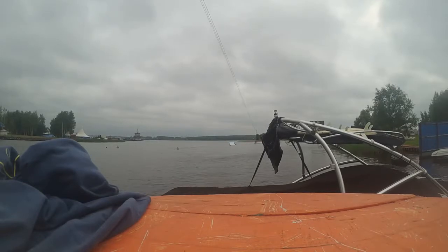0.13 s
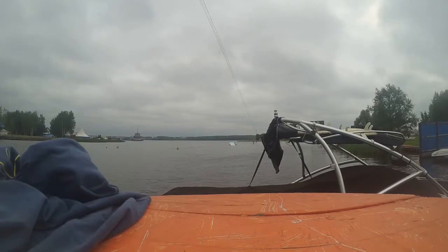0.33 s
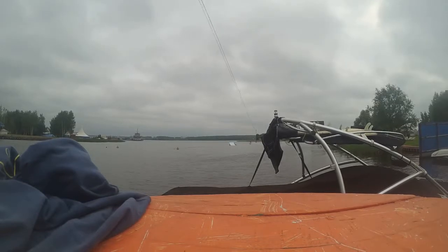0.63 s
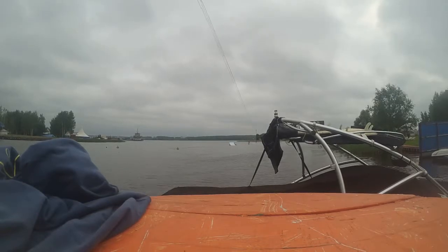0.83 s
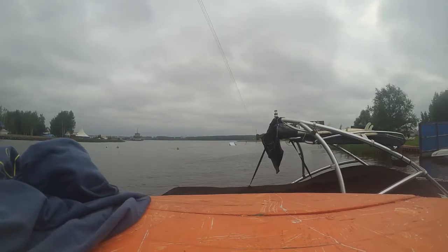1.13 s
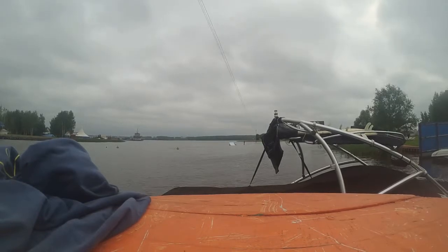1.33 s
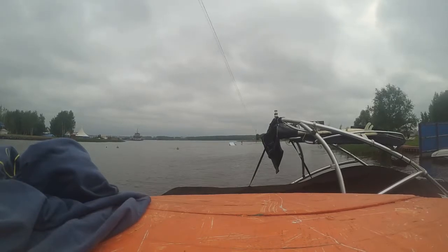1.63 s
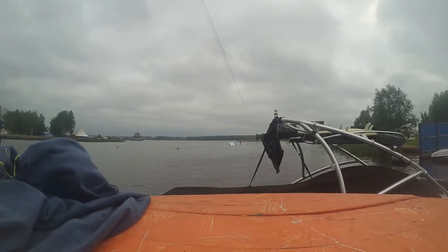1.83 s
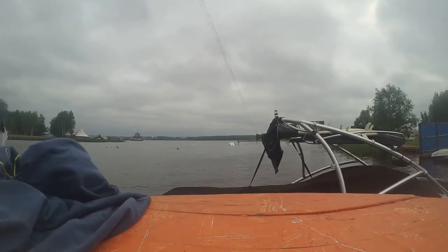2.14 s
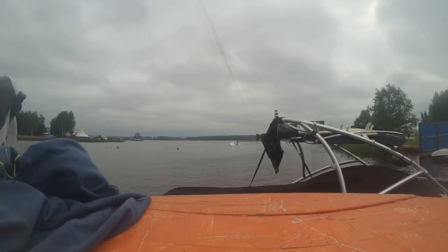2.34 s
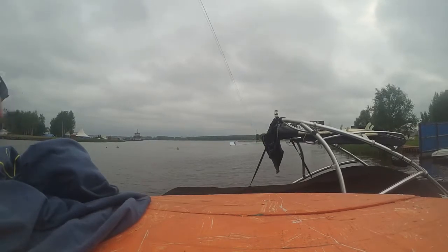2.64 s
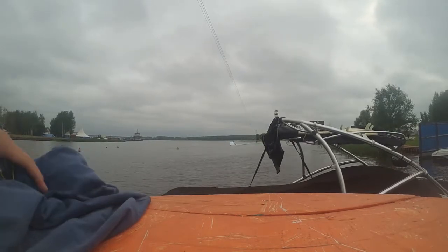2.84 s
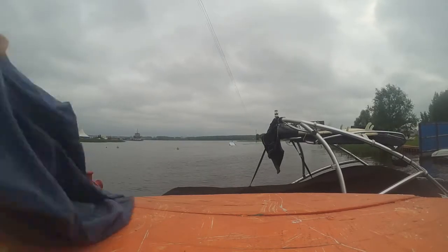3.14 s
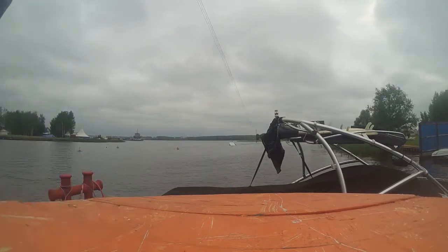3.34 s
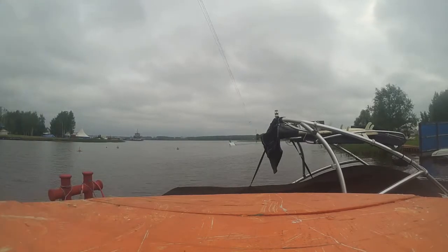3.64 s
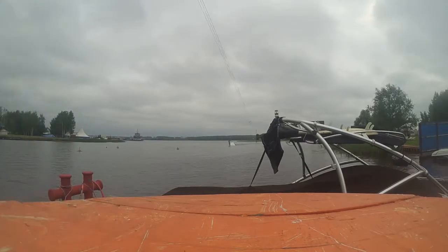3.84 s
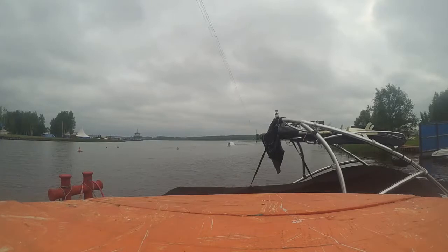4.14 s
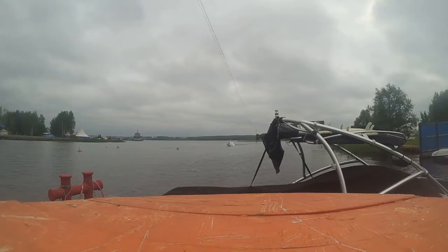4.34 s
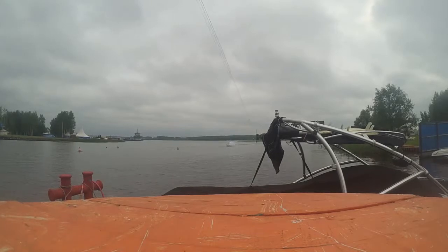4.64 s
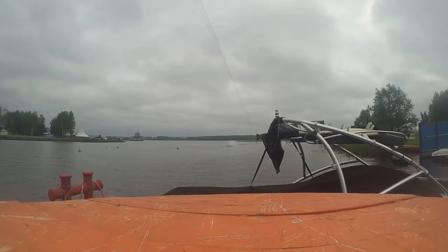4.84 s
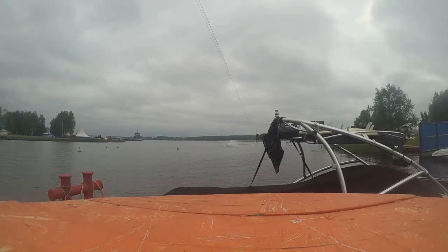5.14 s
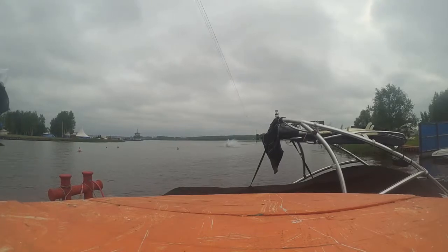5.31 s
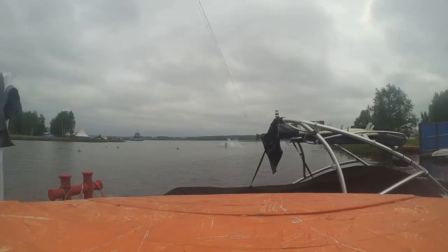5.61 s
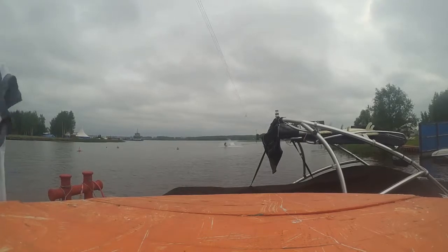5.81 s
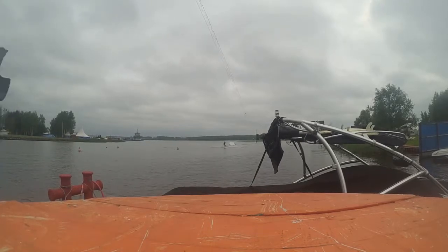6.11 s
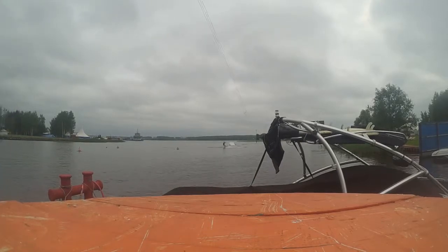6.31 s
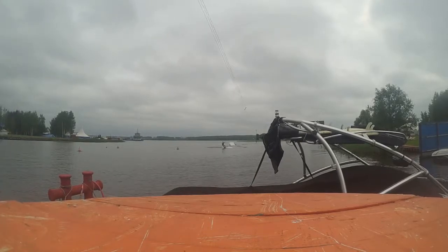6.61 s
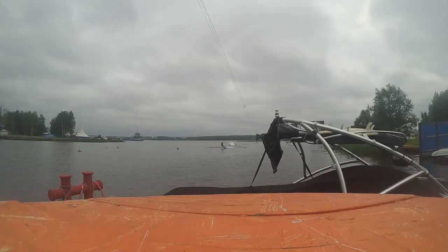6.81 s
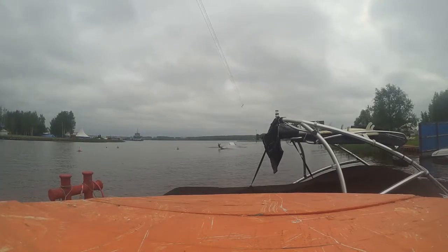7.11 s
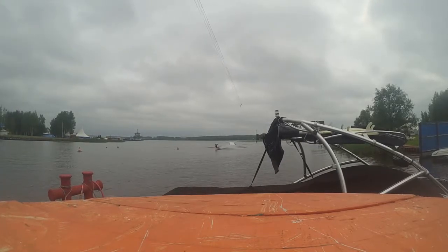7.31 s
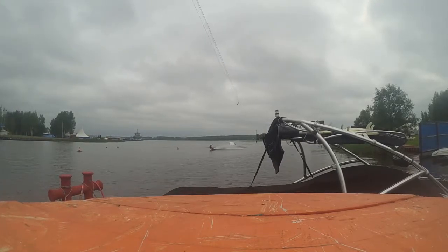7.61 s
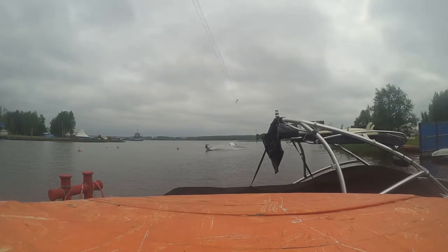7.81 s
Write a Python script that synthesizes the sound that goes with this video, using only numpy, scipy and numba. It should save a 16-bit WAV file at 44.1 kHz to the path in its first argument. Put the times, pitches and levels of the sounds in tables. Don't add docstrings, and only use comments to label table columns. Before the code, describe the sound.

Low watery booms under a hollow float outdoors, a short fabric rustle, a sharp clattering flurry of bumps, then soft swells with distant spray hiss.

```python
import sys
import numpy as np
from scipy import signal
from scipy.fft import rfft, irfft
from scipy.io import wavfile
from scipy.ndimage import uniform_filter1d
from numba import njit

SR = 44100
rng = np.random.default_rng(int(sys.argv[2]) if len(sys.argv) > 2 else 0)


def output_pcm(signal):
    pcm = np.clip(np.atleast_2d(signal).T, -1, 1) * 32767
    wavfile.write(sys.argv[1], SR, np.round(pcm).astype(np.int16))


def nominal_scale(level):
    x = np.asarray(level, float) / 20
    return 10 ** x


N = 350902

# pitch_hz, t60_s, level_db
WALL_MODES = [(72.07, 0.53, 0)]
DECK_MODES = [(95.27, 0.29, 0)]
CAVITY_MODES = [(131.74, 0.32, 0)]
PANEL_MODES = [(184, 0.38, -6), (189.1, 0.17, 10.5), (209.2, 0.13, 3), (290, 0.17, -17)]
# pitch_hz, t60_s, level_db
RIM_MODES = [(267.5, 0.21, 4), (286.2, 0.36, 4), (304, 0.42, -23.5)]
# crest_s, cavity_db, walls_share_db, deck_share_db
WAVES = [(0.07, -65, -12, -4), (0.31, -47, -7, -18), (0.44, -58.5, 7.5, 0.5), (0.72, -57.5, -16, -14),
         (0.95, -57, -3, -2.5), (1.18, -41, -2, -2.5), (1.27, -35.5, -13, -22), (1.658, -47, -5, -4.5),
         (1.99, -64, 6, 7.5), (2.37, -54, -17, -6), (2.62, -55.5, 0, -4), (2.85, -52, -14, -10),
         (3.17, -54.5, -2, -1), (3.36, -69, 17, 3), (3.68, -54, -7, -18), (4.148, -47.5, 1.5, -8),
         (4.32, -52.5, 5, -19), (4.43, -52, 9, 5.5), (4.62, -36.5, 8, 0.5), (4.738, -38.5, 5, -30),
         (5.03, -53, -22, -26), (5.249, -47, -22, -35), (5.48, -49.5, -18, -11.5), (5.95, -64.5, -8, 4.5),
         (6.2, -57, -12, -18), (6.32, -54.5, -5, 10), (6.479, -41.5, 2, -30), (7.01, -34.5, -13, -11),
         (7.12, -42, -11, -8.5), (7.21, -60, 19.5, -3), (7.82, -34.5, -24, -30)]
# start_s, cavity_peak_db, panels_db, rim_db
SLAPS = [(0.279, -34, -51.5, -74), (0.418, -45.5, -55.5, -61), (1.161, -31.5, -43.5, -78),
         (1.185, -39, -40.5, -68), (1.659, -54, -54, -57), (1.767, -53, -59.5, -64), (3.298, -43, -53, -66),
         (3.345, -49, -74, -74), (3.996, -39.5, -59, -65), (4.146, -49, -50, -66), (4.409, -46, -50, -65),
         (4.518, -45, -37, -45), (4.531, -39, -31.5, -32.5), (4.594, -39, -31.5, -38),
         (4.724, -30, -44, -56), (5.224, -41.5, -58, -83), (6.3, -60, -70, -86), (6.889, -50, -67, -80),
         (7.782, -34, -64, -83)]
# time_s, level_db
SWAY_LEVEL = [(0.0, -63), (0.44, -33), (0.73, -45.5), (0.95, -40.5), (1.2, -51), (1.24, -37.5), (1.37, -31),
              (1.42, -60), (1.48, -45.5), (1.79, -29.5), (1.93, -44.5), (4.76, -56), (5.49, -41.5),
              (6.62, -61.5), (7.62, -47), (7.95, -57)]
# pitch_hz, t60_s, level_db
SWAY_MODES = [(7, 0.6, 1.5), (12, 0.63, -10), (18, 0.48, -2)]
# crest_s, level_db, fall_db_per_s
HEAVES = [(0.32, -33.5, 56), (1.2, -44, 46), (1.44, -41, 23), (1.64, -36.5, 76), (2.1, -50, 12),
          (3.39, -45, 52), (4.17, -39.5, 19), (4.68, -46, 71), (5.88, -49, 36), (6.55, -51, 71),
          (7.15, -51, 43), (7.86, -48.5, 56)]
# pitch_hz, t60_s, level_db
HEAVE_MODES = [(35.24, 0.67, 0)]
# start_s, peak_db
JOLTS = [
    (0.293, -30),
    (1.619, -24.5),
    (4.129, -29.5),
]
# start_s, peak_db,
# pitch_hz, swell_s
THUMPS = [(1.158, -27.5, 188, 0.021), (1.175, -24, 162.6, 0.013), (1.195, -22.5, 131, 0.017),
          (1.242, -21.5, 134.7, 0.021), (3.164, -53.5, 1610, 0.0067), (3.188, -61, 2150, 0.0071),
          (3.222, -61, 2230, 0.0051), (3.063, -61, 1660, .006), (3.299, -43, 204, 0.0064),
          (3.325, -44.5, 204, 0.023), (4.027, -43, 135, 0.02), (4.135, -34.5, 141, 0.014),
          (4.2, -39, 35, 0.2), (4.408, -39, 152, 0.0091), (4.506, -27, 222.6, 0.039),
          (4.53, -20.5, 193.7, 0.013), (4.548, -24.5, 195, 0.0077), (4.54, -41, 280, 0.023),
          (4.55, -37, 1390, 0.0028), (4.553, -35, 772, 0.0045), (4.726, -50, 1440, 0.006),
          (4.016, -58, 1070, .002), (4.023, -56, 1090, .003), (4.079, -56, 1000, 0.0026),
          (4.0965, -37, 1160, 0.00095), (4.105, -45, 1000, 0.0023), (3.22, -58, 960, 0.0037),
          (3.254, -56, 1020, .005), (3.34, -59, 980, .008), (3.376, -62, 930, .005),
          (4.14, -48, 1900, 0.0028), (1.179, -28.5, 172, 0.01), (4.582, -19.5, 210.5, 0.014),
          (4.58, -44.5, 291, 0.021), (4.6, -35, 100.8, 0.031), (4.61, -32, 69.1, 0.083),
          (4.655, -36.5, 96.7, 0.02), (4.665, -29, 176.6, 0.013), (4.722, -28.5, 196, 0.018),
          (4.722, -42.5, 311, 0.011), (4.735, -34, 127.8, 0.023), (4.731, -30.5, 71.9, 0.056),
          (6.3, -54, 196, 0.054), (6.369, -37.5, 137.5, 0.032), (6.889, -40, 137.3, 0.034),
          (7.22, -38, 135.5, 0.016)]
# start_s, peak_db, lower_modes_db, upper_modes_db
KNOCKS = [(0.352, -46, -16, -30), (0.486, -51, -5, -10), (1.161, -47, -6, -16), (1.184, -55, -19, -24),
          (1.251, -56, -19, 3), (1.633, -51.5, -21, -17), (1.657, -50.5, 2.5, -30), (1.761, -45, -5, -33),
          (1.921, -49, -18, -20), (1.973, -48, -31, -15), (3.165, -52, -24, -9), (3.277, -50, -19, -8),
          (3.295, -43.5, -6, -3.5), (4.017, -55, 8.5, -10), (4.047, -42, -2, -16), (4.097, -33, -18, -8),
          (4.114, -30.5, -9, -9.5), (4.146, -34.5, -7, -8), (4.167, -37, -14.5, -26), (4.284, -52, -23, -3),
          (4.412, -49, -8, -4), (4.513, -34, -2.5, -17), (4.549, -29, -1, -19.5), (4.576, -40, -0.5, -34),
          (4.597, -35.5, -7, -30.5), (4.62, -38.5, -9, -16), (4.66, -36.5, -9.5, -22.5),
          (4.728, -33, 5, -42)]
# pitch_hz, t60_s, level_db
CASE_LOW = [(350, 0.19, -27), (535, 0.071, -3.5), (615, 0.05, -32.5)]
CASE_MID = [(885, 0.15, -13), (1024, 0.032, 2.5), (1240, 0.062, -9.5), (1403, 0.024, 1)]
CASE_HIGH = [(1760, 0.063, -13), (2193, 0.018, 0), (2890, 0.083, -13), (4070, 0.0066, 22)]
# start_s, level_db, hold_s, upper_modes_share_db
RUBS = [(0.358, -56.5, .01, -24), (1.18, -59, .01, -15), (2.991, -66, .08, -18), (3.087, -57, 0.069, -30),
        (3.17, -64, 0.025, -8), (3.22, -65, 0.082, -7), (3.29, -56.5, 0.03, -24), (3.328, -62, 0.043, -12),
        (4.022, -56.5, 0.016, -14), (4.1, -60, 0.023, -4), (4.21, -60.5, 0.094, -10),
        (4.404, -54, 0.016, -15.5), (4.442, -62, 0.071, -14), (4.533, -52, .02, -22),
        (4.537, -42, 0.013, -30), (4.594, -47, 0.017, -16.5), (4.724, -69, .01, -21)]
# start_s, peak_db, pitch_hz
LID_SLIPS = [(0.3548, -43, 1025), (1.6564, -44, 990), (1.7612, -45.5, 963), (1.9747, -55, 1040),
             (3.095, -53, 1090), (3.1007, -48, 1050), (3.1073, -56, 1020.0), (3.1143, -52, 920),
             (3.1624, -47, 1150), (3.1681, -49, 1130), (3.1736, -48, 1050.0), (3.1823, -46, 1050),
             (3.2441, -51, 1090), (3.2755, -49, 1190.0), (3.2934, -42, 1210.0), (3.2992, -50, 980.0),
             (3.3086, -56, 1100.0), (3.3216, -49, 990.0), (3.3286, -44.5, 1030.0), (4.0478, -37.5, 910.0),
             (4.1009, -40, 1140), (4.1131, -46, 1110.0), (4.1188, -42, 1160), (4.124, -50, 1020.0),
             (4.1395, -39, 1170), (4.1458, -42, 1150), (4.154, -38, 960), (4.1649, -37, 950.0),
             (4.1738, -41, 960), (4.4024, -46, 940), (4.409, -48, 1020), (4.4175, -56, 1060),
             (4.513, -30, 986), (4.5247, -45, 1020.0), (4.5324, -42, 1015), (4.5395, -38, 970.0),
             (4.5479, -19, 977), (4.5548, -34, 900.0), (4.5692, -47, 980.0), (4.5759, -33, 970),
             (4.5827, -37.5, 960.0), (4.5917, -37, 1000.0), (4.5989, -33, 1010), (4.6047, -41, 1070.0),
             (4.6109, -47, 1000), (4.6186, -38, 1010.0), (4.6302, -40, 1080), (4.6593, -38, 1140),
             (4.6671, -45, 1020.0), (4.6785, -53, 1070.0), (4.7286, -44, 1250)]
# start_s, peak_db
TAPS = [(3.101, -58), (3.15, -46), (3.185, -52), (3.222, -55), (3.244, -52), (3.329, -44), (4.022, -50),
        (4.08, -62), (4.123, -46), (4.384, -47), (4.525, -31), (4.538, -43), (4.557, -30), (4.635, -39),
        (4.788, -44)]
# start_s, peak_db, top_modes_db
DROPS = [(0.0623, -52, 0.5), (0.186, -48, -2), (0.542, -48.5, 0), (0.571, -55.5, 1.5), (1.046, -51, -1),
         (1.082, -54.5, 2), (1.5878, -53.5, 4), (2.1182, -55, -2), (2.164, -50.5, -23), (2.223, -51, -16),
         (2.6475, -47.5, -1.5), (3.211, -55, 3.5), (3.243, -52, 3), (3.7223, -57.5, 6), (4.1011, -50, -23),
         (4.143, -63, -19), (4.22, -49, -22), (4.2645, -49.5, 1), (4.554, -57, -6), (4.804, -45.5, -6),
         (5.092, -55, -5.5), (5.2235, -49, -2.5), (5.343, -53, 2.5), (5.6722, -56.5, 1), (5.8828, -44, -4),
         (6.2448, -51.5, 2), (7.024, -46.5, -3), (7.2638, -49, -10), (7.463, -53, 0), (7.5026, -55.5, -12)]
# start_s, peak_db
SMALL_TICKS = [(0.3451, -63), (0.5124, -58), (1.3043, -57), (1.4476, -57), (2.005, -68), (2.0482, -61),
               (2.2483, -63), (2.4019, -59), (2.4618, -54), (2.7876, -61), (2.9417, -58), (3.0021, -61),
               (3.0619, -60), (3.1472, -56), (3.5423, -56), (3.8482, -63), (4.0218, -54), (4.2068, -59),
               (4.3879, -61), (5.1018, -55), (5.462, -57), (5.8217, -52), (6.3909, -54.5), (6.4817, -53),
               (6.5475, -59), (6.782, -59), (7.202, -60), (0.4219, -57), (0.7881, -55), (0.9243, -63),
               (5.5887, -54), (6.3614, -59), (6.5111, -58), (6.6574, -49), (6.8573, -53), (7.2315, -58),
               (7.3876, -68.5)]
# pitch_hz, t60_s, level_db
DROP_MID = [(2904, 0.05, -0.5), (3042, 0.024, 3.5), (1910, 0.092, -14.5), (1380, 0.0077, -9)]
DROP_TOP = [(6460, 0.0076, -1.5), (7380, 0.0025, 8)]
# time_s, level_db
SPRAY_LEVEL = [(0.0, -70), (1.02, -77), (3.19, -72.5), (4.1, -75.5), (4.36, -70), (4.94, -70.5),
               (5.56, -70.5), (5.92, -65), (6.27, -65), (7.27, -71), (7.6, -64.5), (7.96, -62)]
# pitch_hz, density_db_per_hz
SPRAY_COLOUR = [(880, -10), (1500, -5.5), (2010, -5), (2860, -4.5), (3170, -3), (3740, -2), (4620, -5),
                (4940, 0), (5650, -6.5), (9000, -17), (11700, -25), (19800, -120)]
# pitch_hz, width_hz, level_db
SPRAY_PEAKS = [(3763, 91, -1.5), (4065, 246, -3.5), (4370, 90, -10.5), (4850, 120, 0.5)]
# pitch_hz, density_db_per_hz
AIR_COLOUR = [(94, -7.5), (160, 10.5), (243, -39), (357, -48), (632, -39.5), (751, -26.5), (1190, -1.5),
              (1610, -34), (2310, -34), (2910, -18.5), (4600, -8), (4960, -39), (5460, -23.5), (10200, -20),
              (15300, -22.5)]
# pitch_hz, width_hz, level_db
AIR_PEAKS = [(541.7, 6.8, -4), (997, 116, -10), (1435.4, 58, -5), (1962, 146, -14), (2913, 420, -15),
             (3930, 9, -9), (4410, 22, -12.5), (4942, 67, -8.5), (5130, 61, -11), (5970, 47, -16),
             (6530, 53, -21), (7230, 440, -19.5)]
# pitch_hz, width_hz, level_db
HUM_PEAKS = [(269, 8.7, -3.5), (311, 38, -12), (419, 7.1, -1), (463, 3.1, 1), (631.6, 8.1, 2),
             (642, 4.3, -13)]
# pitch_hz, rms_db
WHINE_TONES = [(2998, -83.5), (3978, -87), (4409, -73), (4584, -82), (4872, -74.5), (5044, -87.5),
               (5130, -66), (5335, -107), (5416, -87), (5593, -84), (6282, -88), (7434, -88), (8586, -87.5),
               (8764, -100), (9916, -81), (10088, -86.5), (10174, -82.5), (10460, -99), (10928, -88),
               (14960, -102)]
# pitch_hz, density_db_per_hz
SIDE_COLOUR = [(20, -70), (300, -61.5), (480, -37), (900, -44), (2660, -45), (4030, -43), (4900, -40.5),
               (5470, -43), (10100, -50.5), (15300, -50)]


def shell():
    crest_s, db, walls_db, deck_db = np.transpose(WAVES)
    slap_s, _, slap_db, _ = np.transpose(SLAPS)
    panel_s = np.r_[slap_s + 0.01, crest_s]
    panel_db = np.r_[slap_db - 8.5, db - 28]
    # group, times s, levels dB, calm level dB, rise dB/s, hold s, fall dB/s
    drives = [(WALL_MODES, crest_s, db + walls_db, -68, 185, 0, 118.5),
              (DECK_MODES, crest_s, db + deck_db, -85, 246, 0.12, 106),
              (CAVITY_MODES, crest_s, db, -63.5, 239.5, 0.1133, 107.5),
              (PANEL_MODES, panel_s, panel_db, -73, 612.5, 0.09, 193.5)]
    out = 0
    for group, times, level_db, calm_db, rise, hold, fall in drives:
        gain = surges(times, level_db, rise, fall, hold, calm_db)
        out = out + ringing(gain, group, steady=0.98, chop=0.58)
    return out


def slaps():
    s, cavity_db, panel_db, rim_db = np.transpose(SLAPS)
    cavity = modes(blows(s, cavity_db - 13.5, 0.00023), [(129.7, 0.32, 8.5), (127.7, 0.39, 3.0)])
    panels = modes(blows(s, panel_db - 9.5, 0.00061), PANEL_MODES)
    rim = beside(modes(blows(s, rim_db - 4.0, 0.02), RIM_MODES), RIM_MODES)
    return dull(dull(cavity, 182), 182) + dull(dull(panels, 288), 288) + dull(rim, 299)


def rocking():
    sway = ringing(curve(SWAY_LEVEL), SWAY_MODES, steady=0.51, chop=1.66)
    crest_s, heave_db, fall = np.transpose(HEAVES)
    heave_gain = surges(crest_s, heave_db, rise=170, fall=fall, calm_db=-66)
    heave = ringing(heave_gain, HEAVE_MODES, steady=0.21, chop=0.77)
    push = np.zeros(N)
    for s, db in JOLTS:
        push[int(s * SR)] = nominal_scale(db)
    jolts = dull(modes(push, [(30.5, 0.14, 0)]), 94)
    return sway + heave + jolts


def thumps():
    out = np.zeros(N)
    for s, db, hz, swell in THUMPS:
        t = np.arange(int(9 * swell * SR)) / SR
        shape = (t / swell * np.exp(1 - t / swell)) ** 2.0
        tone = np.sin(2 * np.pi * hz * t * (1 - 0.22 * t))
        k = int(s * SR)
        out[k:k + len(t)] += nominal_scale(db) * shape * tone
    return out


def knocks():
    s, db, low_db, high_db = np.transpose(KNOCKS)
    low = modes(blows(s, db + low_db - 0.5, 0.0055), CASE_LOW)
    mid = modes(blows(s, db - 7, 0.0018), CASE_MID)
    high = modes(blows(s, db + high_db - 4.5, 0.0031), CASE_HIGH)
    return dull(low, 1700) + dull(mid, 1480) + dull(high, 2730)


def rubbing():
    s, db, hold, top_db = np.transpose(RUBS)
    body = unit(dull(scrape(CASE_MID) + nominal_scale(-30.5) * scrape(CASE_LOW), 2050))
    top = unit(dull(scrape([(1670, 0.0093, 0.0098), (2180, 0.044, 0.003)]), 2700))
    rise, fall = 506, 137
    body_gain = surges(s, db - 2.5, rise, fall, hold)
    top_gain = surges(s, db + top_db - 2.0, rise, fall, hold)
    return body_gain * body + top_gain * top


def lid_slips():
    swell_s, tail_db, tail_t60_s = 0.0022, -12.5, 0.03
    out = np.zeros(N)
    t = np.arange(1500) / SR
    swell = (t / swell_s * np.exp(1 - t / swell_s)) ** 1.7
    tail = nominal_scale(tail_db) * np.minimum(t / swell_s, 1) * nominal_scale(-60 * t / tail_t60_s)
    for s, db, hz in LID_SLIPS:
        k = int(s * SR)
        out[k:k + len(t)] += nominal_scale(db - 4.5) * (swell + tail) * np.sin(2 * np.pi * hz * t)
    return out


def taps():
    s, db = np.transpose(TAPS)
    return dull(modes(blows(s, db - 19, 0.0023), CASE_MID), 1500)


def drizzle():
    s, db, top_db = np.transpose(DROPS)
    clear = modes(blows(s, db - 7.0, 0.0021), DROP_MID)
    clear = clear + modes(blows(s, db + top_db - 5.0, 0.00042), DROP_TOP)
    s, db = np.transpose(SMALL_TICKS)
    small = modes(blows(s, db - 4.0, 0.00065), DROP_TOP) + modes(blows(s, db - 9, 0.00077), DROP_MID)
    fine = (rng.random(N) < 35 / SR) * rng.standard_normal(N)
    patter = unit(modes(fine, DROP_MID) + nominal_scale(6.5) * modes(fine, DROP_TOP))
    return clear + small + nominal_scale(-77) * patter


def spray():
    level = curve(SPRAY_LEVEL)
    hiss = nominal_scale(0.5) * nominal_scale(1.0 * walk(8)) * coloured(SPRAY_COLOUR)
    return level * (hiss + nominal_scale(-6.5) * resonant(SPRAY_PEAKS))


def air():
    bed = nominal_scale(-66 + 0.5 * walk(13.0)) * coloured(AIR_COLOUR)
    murmur = nominal_scale(-75) * dull(resonant(HUM_PEAKS), 655)
    return bed + nominal_scale(-68.5) * resonant(AIR_PEAKS) + murmur


def whine():
    out = 0
    for hz, db in WHINE_TONES:
        phase = 2 * np.pi * np.cumsum(hz + 1.35 * walk(5)) / SR
        out = out + np.sqrt(2) * nominal_scale(db + 0.31 * walk(3.0)) * np.sin(phase)
    return out


def patchy(x):
    hz, _, z = signal.stft(x, SR, nperseg=2048)
    band = (np.log2(hz + 300) * 6).astype(int)
    luck = rng.standard_normal((band.max() + 1, z.shape[1]))
    brief = uniform_filter1d(luck, size=3)
    lasting = uniform_filter1d(luck, size=41) * 2
    shared = uniform_filter1d(luck[:1], size=5)
    luck = unit(brief + lasting + shared)
    rarity = 0.4 + 1.0 * ((hz < 3200) | (hz > 11000))
    gain = nominal_scale(-40) + (luck[band] > rarity[:, None])
    return signal.istft(z * gain, SR, nperseg=2048)[1][:N]


def silence_faint(x):
    size = 2048
    window = np.sin(np.pi * (np.arange(size) + 0.5) / size)
    hz, _, z = signal.stft(np.pad(x, [(0, 0), (0, size)], "reflect"), SR, window, size, noverlap=size // 2)
    power = 2 * np.abs(z[0]) ** 2
    edges = np.unique(np.searchsorted(hz, 600 * 2 ** np.arange(0, 4.8, 1 / 10)))
    bins = np.diff(edges, append=len(hz))
    density = np.add.reduceat(power, edges) / bins[:, None] / hz[1]
    density_db = 10 * np.log10(density + 1e-30)
    weight = np.minimum(0.68 + hz / 120, 1)
    loud_db = 10 * np.log10(uniform_filter1d(weight @ power, size=2))
    floor_db = -117.5 + 0.68 * (loud_db + 45.5) + 1.9 * rng.standard_normal(len(loud_db))
    tilt_db = 0.73 * np.log2(12000 / hz[edges])[:, None]
    floor_db = floor_db + tilt_db + 0.44 * rng.standard_normal(density_db.shape)
    gain = np.clip((density_db - floor_db) / 0.69, 0, 1)
    z[:, edges[0]:] *= np.repeat(gain, bins, axis=0)
    return signal.istft(z, SR, window, size, noverlap=size // 2)[1][:, :N]


@njit
def ring(x, pole, steady):
    y, z = np.empty(len(x)), 0j
    for i in range(len(x)):
        z = z * pole + x[i]
        y[i] = z.imag / (abs(z) + 1e-9) ** steady
    return y


def modes(x, table, steady=0.):
    out = 0
    for hz, t60, db in table:
        pole = np.exp(2j * np.pi * hz / SR - np.log(1000) / (t60 * SR))
        out = out + nominal_scale(db) * ring(x + 1e-18, pole, steady)
    return out


def ringing(gain, group, steady, chop):
    slosh = unit(modes(modes(rng.standard_normal(N), group), group, steady))
    rough = unit(modes(rng.standard_normal(N), group, steady))
    return gain * unit(beside(slosh + chop * rough, group))


def beside(x, group):
    band = [0.755 * group[0][0], 1.211 * group[-1][0]]
    return signal.sosfilt(signal.butter(3, band, "bandpass", fs=SR, output="sos"), x)


def surges(times, db, rise, fall, hold=0, calm_db=-150):
    grid = np.arange(0, N, 32)
    t = grid[:, None] / SR - times
    shape_db = db + np.minimum(t, 0) * rise - np.maximum(t - hold, 0) * fall
    power = np.sum(nominal_scale(shape_db) ** 2, axis=1) + nominal_scale(calm_db) ** 2
    return np.interp(np.arange(N), grid, np.sqrt(power))


def blows(times, db, push_s):
    size = 512
    x = np.zeros(N + size)
    n = np.arange(size)
    rough = rng.standard_normal((len(times), size)) * np.exp(-n / (push_s * SR)) * n ** 0.32
    rough /= np.sqrt(np.sum(rough ** 2, axis=1, keepdims=True))
    for s, gain, push in zip(times, nominal_scale(db), rough):
        k = int(s * SR)
        x[k:k + size] += gain * push
    return x[:N]


def scrape(table):
    slips = (rng.random(N) < 2500 / SR) * rng.standard_normal(N) * nominal_scale(2.0 * walk(60))
    return sum(modes(slips * nominal_scale(3.5 * walk(45)), [mode]) for mode in table)


def resonant(table):
    out = 0
    for hz, width, db in table:
        mode = unit(modes(rng.standard_normal(N), [(hz, 3.0 / width, 0)]))
        out = out + nominal_scale(db + 10 * np.log10(width / 50) + 2.0 * walk(8)) * mode
    return out


def coloured(table):
    hz, db = np.transpose(table)
    log_hz = np.log(np.arange(N // 2 + 1) * SR / N + 1e-3)
    tilt = nominal_scale(np.interp(log_hz, np.log(hz), db))
    return unit(irfft(rfft(rng.standard_normal(N)) * tilt, N))


def walk(rate):
    k = int(SR / rate)
    held = np.repeat(rng.standard_normal(N // k + 1), k)
    return 1.533 * uniform_filter1d(uniform_filter1d(held, k), k)[:N]


def curve(table):
    s, db = np.transpose(table)
    return nominal_scale(np.interp(np.arange(N) / SR, s, db))


def dull(x, hz):
    return signal.sosfilt(signal.butter(6, hz, fs=SR, output="sos"), x)


def unit(x):
    return x / np.sqrt(np.mean(x ** 2))


def scene():
    water = shell() + slaps() + rocking() + thumps()
    handling = knocks() + rubbing() + lid_slips() + taps()
    background = drizzle() + spray() + air() + whine()
    mono = water + handling + background
    fade = np.minimum(np.arange(N)[::-1] / SR / 0.008, 1)
    return np.array([mono, mono]) * fade


def roll_off(x):
    return signal.sosfilt(signal.butter(12, 15230, fs=SR, output="sos"), x)


def record(dry):
    opposite = np.array([[1], [-1]])
    side = nominal_scale(-76 + 2.0) * patchy(coloured(SIDE_COLOUR)) * opposite
    mix = silence_faint(dry + side) - 0.001 + 0.0003 * opposite
    return roll_off(mix)


dry = scene()
out = record(dry)
output_pcm(out)
```